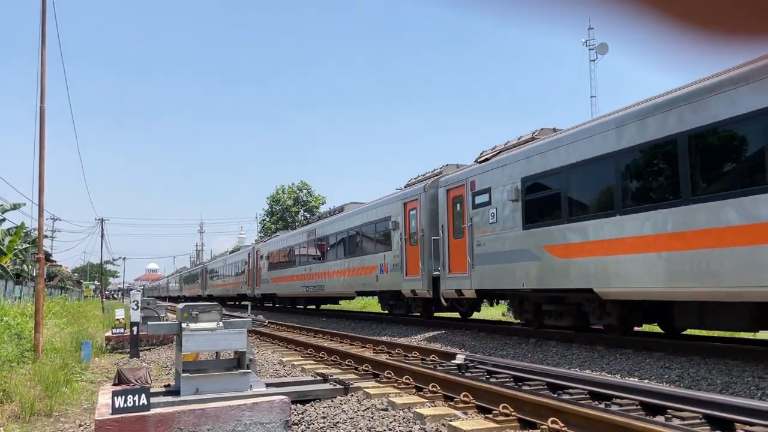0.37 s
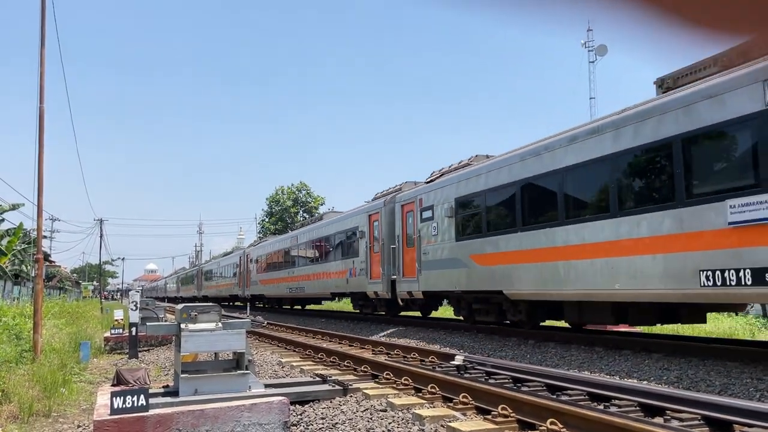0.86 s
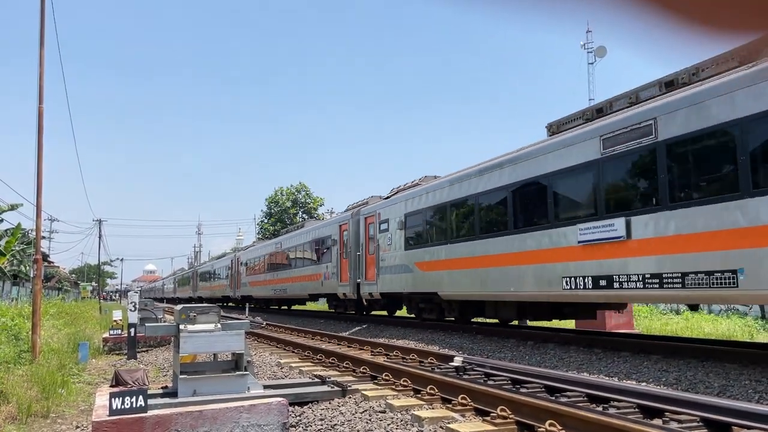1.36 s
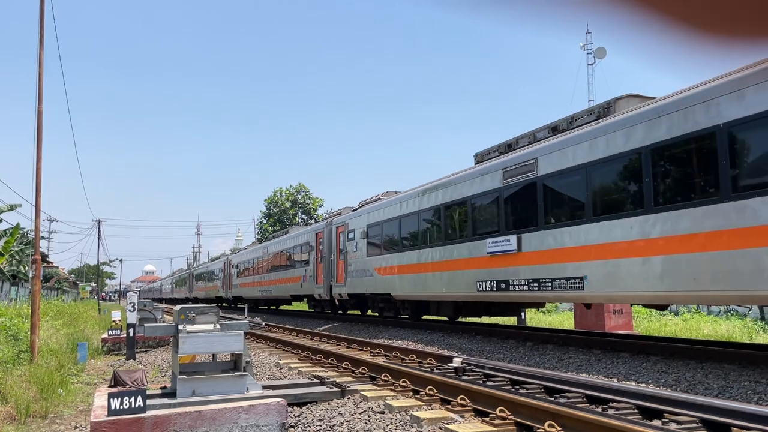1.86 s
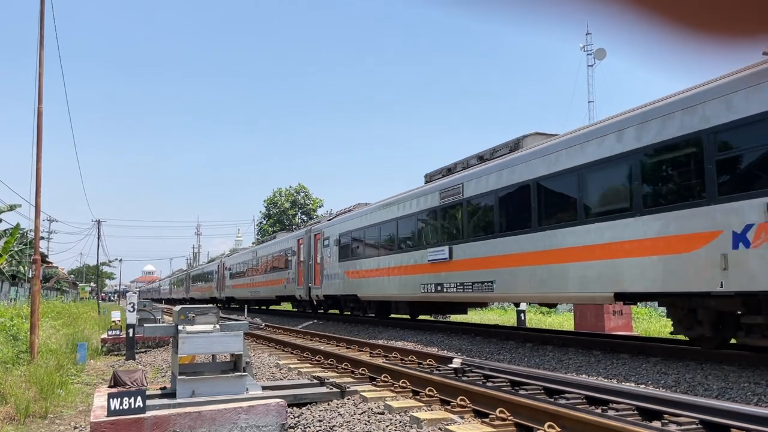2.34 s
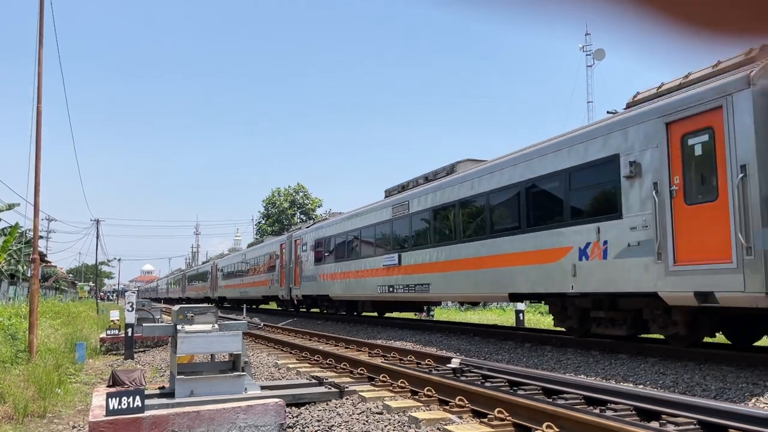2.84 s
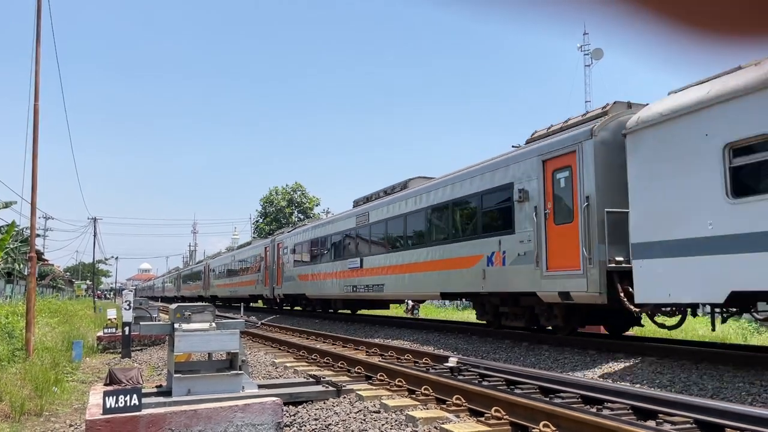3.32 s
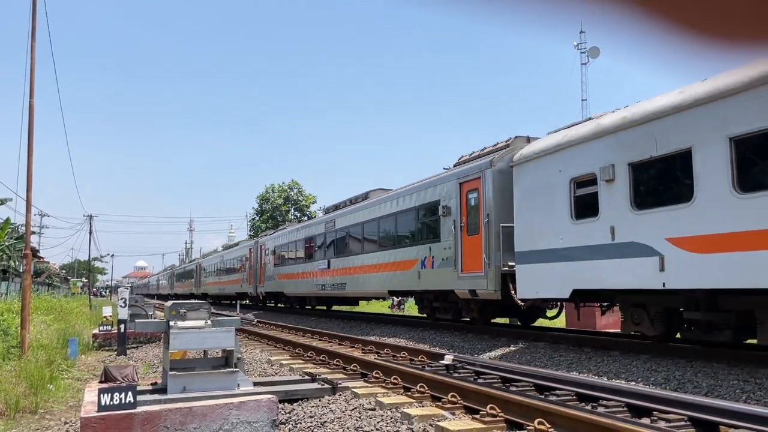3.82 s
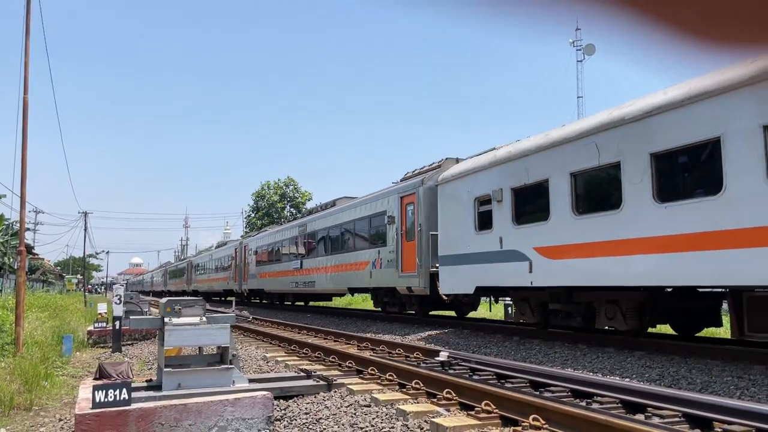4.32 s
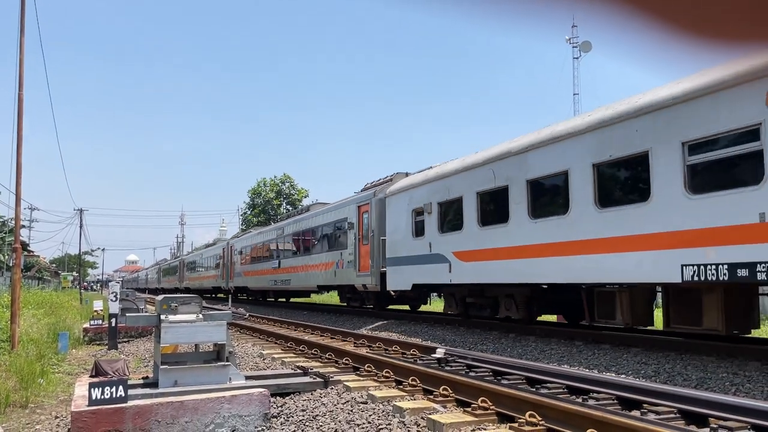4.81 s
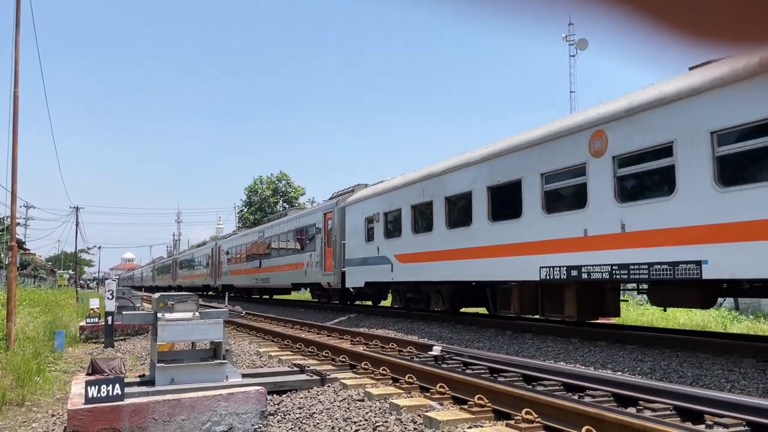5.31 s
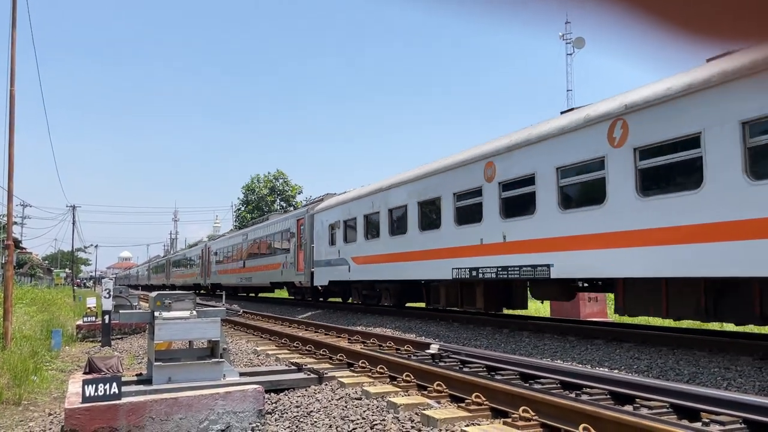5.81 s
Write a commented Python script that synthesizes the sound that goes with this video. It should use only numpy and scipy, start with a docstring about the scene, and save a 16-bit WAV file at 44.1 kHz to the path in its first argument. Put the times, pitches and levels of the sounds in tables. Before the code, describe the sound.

Outdoors beside a railway track, coaches roll slowly past. A low diesel generator drone around 60 Hz wavers over soft body rumble and faint wheel hiss. Wheels rattle over rail joints in irregular bursts, one flange squeals briefly near the middle, then the strongest clacks follow. Toward the end the clatter thins and the generator grows fuller and rougher. Close handheld stereo microphone.

```python
"""Trackside: passenger coaches roll slowly past while the generator car draws near.
Diesel: sines on multiples of the engine cycle. Body rumble and wheel-rail hiss: shaped random spectra.
Rail joints: rattling noise bursts through wheel modes. One flange squeals briefly: a sine and its octave.
Faint whines: narrow noise bands. Two microphone ports hear it, unlike in level and detail by frequency."""
import sys
import numpy as np
from scipy import signal
from scipy.fft import rfft, irfft, next_fast_len
from scipy.io import wavfile
from scipy.ndimage import uniform_filter1d

SR = 44100
rng = np.random.default_rng(int(sys.argv[2]) if len(sys.argv) > 2 else 0)


def store_pcm(level_fs):
    """Save levels as 16-bit WAV."""
    pcm = np.round(np.clip(level_fs, -1, 1) * 32767).astype(np.int16)
    wavfile.write(sys.argv[1], SR, np.atleast_2d(pcm).T)


def ratio(d):
    """dB to gain"""
    e = np.asarray(d, float) / 20
    return 10 ** e


N = 272097


def evened(x, axis=None):
    """Scale to unit rms."""
    return x / np.sqrt(np.mean(x ** 2, axis, keepdims=True) + 1e-20)


def read(table, hz):
    """Table columns against log frequency."""
    f_hz, *columns = np.transpose(table)
    return [np.interp(np.log(hz + 1), np.log(f_hz + 1), c) for c in columns]


def follow(table, t_s):
    """Table columns against time."""
    at_s, *columns = np.transpose(table)
    return [np.interp(t_s, at_s, c) for c in columns]


def add(mix, start_s, sound):
    """Add sound to mix in place, cut at the end of mix."""
    part = mix[:, round(start_s * SR):][:, :sound.shape[1]]
    part += sound[:, :part.shape[1]]


CYCLE_HZ, SPEED_M_S, TRACK_M, LEVEL_S, SOUND_M_S = 12.59, 5.8, 8., 6.4, 343.
FAR_M, NEAR_M = 31.1, 6.55  # nearness 0 beyond the first, 1 within the second


def approach(t_s):
    """Doppler-raised cycle rate [Hz] of the closing generator car, and its nearness 0-1."""
    along_m = SPEED_M_S * (LEVEL_S - t_s)
    away_m = np.hypot(along_m, TRACK_M)
    cycle_hz = CYCLE_HZ * (1 + SPEED_M_S / SOUND_M_S * along_m / away_m)
    return cycle_hz, np.clip((FAR_M - away_m) / (FAR_M - NEAR_M), 0, 1)


def shaft_beat():
    """Cosine of the crankshaft angle: two turns per engine cycle."""
    cycle_hz = approach(np.arange(N) / SR)[0]
    return np.cos(2 * 2 * np.pi * np.cumsum(cycle_hz) / SR)


# Passing levels, also used by rolling():
# (time [s], wheel-rail hiss level [dB], rumble level [dB], lowest firing tone level [dB])
PASSING_LEVELS = [(0, -36, -23.5, -16.5), (.6, -37, -20.5, -31), (1.2, -37.5, -19, -27),
                  (1.9, -36, -19.5, -30.5), (2.4, -34.5, -19.5, -34), (2.62, -35, -23, -25),
                  (2.8, -36, -21, -22.5), (3.2, -33.5, -23, -19.5), (3.6, -33.5, -20.5, -16.5),
                  (4.2, -33, -21.5, -18.5), (4.8, -32, -20.5, -21), (5.4, -32.5, -18.5, -16),
                  (5.9, -31, -17.5, -18), (6.17, -29.5, -17.5, -14.5)]
# Engine orders; the lowest firing tone is relative to its passing level:
# (multiple of the cycle rate [1], far level [dB], near level [dB])
ENGINE_ORDERS = [(5, 0.5, 0.5), (7, -33, -30), (8, -23.5, -28), (10, -28, -25), (11, -41, -57),
                 (12, -39, -31), (13, -38, -38.5), (14, -51, -38), (15, -32.5, -20), (16, -35, -39),
                 (17, -34, -65), (18, -43.5, -39), (20, -41.5, -26.5), (21, -46.5, -64), (22, -53, -24.5),
                 (23, -36, -26.5), (25, -45, -47), (27, -52, -35), (28, -49.5, -38.5), (30, -59, -39.5),
                 (31, -44.5, -31.5), (32, -53, -33), (33, -45.5, -39.5), (45, -52, -30.5), (52, -48, -37)]
CYLINDERS = 5


def generator(smear_rad=1.2, late_rad=1.0, waver=0.15, far_waver=0.26, waver_hz=1.45):
    """Diesel orders: firing orders line up into pulses; shifting echoes make every order waver."""
    t_s = np.arange(0, N + 64, 64) / SR
    near, firing_db = approach(t_s)[1], follow(PASSING_LEVELS, t_s)[2]
    turns = np.cumsum(approach(np.arange(N) / SR)[0]) / SR
    waver_filter = signal.butter(2, waver_hz, fs=SR / 64)
    out = np.zeros((2, N))
    for order, far_db, near_db in ENGINE_ORDERS:
        k = round(order)
        lowest_firing = k == CYLINDERS
        chance = rng.standard_normal((4, 2 * len(t_s)))
        echo = evened(signal.lfilter(*waver_filter, chance)[:, len(t_s):])
        # one cylinder knocks harder, once a cycle: high orders start roughly in phase
        if k % CYLINDERS == 0:
            spread_rad = 0
        elif k > 4 * CYLINDERS:
            spread_rad = smear_rad
        else:
            spread_rad = np.pi
        start_rad = np.pi + spread_rad * rng.standard_normal()
        level_db = far_db + near * (near_db - far_db) + firing_db * lowest_firing
        size = np.sqrt(2) * ratio(level_db)
        depth = waver + far_waver * (1 - near) * (not lowest_firing)
        carrier = np.exp(1j * (2 * np.pi * k * turns + start_rad))
        for path, steady in enumerate((1, np.exp(1j * late_rad))):
            slow = size * (steady + depth * (echo[path] + 1j * echo[path + 2]))
            out[path] += (np.interp(np.arange(N) / SR, t_s, slow) * carrier).real
    return out


def rolling(spectrum, column, size, patch_hz, patchy_db, flicker_db):
    """Random short-time spectra, direct and scattered, with drifting patches and a shared flicker."""
    hop = size // 4
    frames, hz = N // hop + 5, np.fft.rfftfreq(size, 1 / SR)
    a, b, c, d, patches = rng.standard_normal((frames, len(hz), 5)).T
    patch_bins = max(round(patch_hz * size / SR), 1)
    patches = uniform_filter1d(patches, patch_bins, axis=0)
    patches = evened(uniform_filter1d(patches, size=2560 // hop, axis=1))
    flicker = evened(uniform_filter1d(rng.standard_normal(frames), size=1536 // hop))
    near = approach(np.arange(frames) * hop / SR)[1]
    far_db, near_db = read(spectrum, hz)
    colour = evened(ratio(far_db[:, None] + near * (near_db - far_db)[:, None]), axis=0)
    z = np.array([a + 1j * b, c + 1j * d]) * colour
    z = z * ratio(patchy_db * patches + flicker_db * flicker)
    sound = evened(signal.istft(z, nperseg=size, noverlap=size - hop)[1][:, :N])
    return sound * ratio(follow(PASSING_LEVELS, np.arange(N) / SR)[column])


# Body rumble spectrum: (frequency [Hz], far relative level per Hz [dB], near relative level per Hz [dB])
RUMBLE_SPECTRUM = [(20, -50, -50), (32.2, -33, -39), (51, -2, -10.5), (103.7, 2, 5), (164, -10, -13),
                   (202, -11, -4.5), (307, -12.5, -8.5), (410, -17, -9), (420, -22, -18), (656, -21, -13),
                   (860, -33, -36), (1340, -64, -60)]


def rumble():
    """Coach bodies rumble; engine clatter in it beats once a shaft turn, more as the car nears."""
    sound = rolling(RUMBLE_SPECTRUM, column=1, size=2048, patch_hz=60, patchy_db=2.0, flicker_db=0.8)
    near = approach(np.arange(N) / SR)[1]
    return sound * (1 + 0.3 * near * shaft_beat())


# Wheel-rail hiss spectrum: (frequency [Hz], far relative level per Hz [dB], near relative level per Hz [dB])
HISS_SPECTRUM = [(487, -16, -13), (933, -3, -5), (1394, -4, -6.5), (1460, 4, 1), (1690, -4.5, -1.5),
                 (2295, -5, -5.5), (2380, -9.5, -12), (2940, -10.5, -11), (4340, -14, -18),
                 (5600, -17, -23), (7300, -16, -18.5), (8360, -20.5, -26.5), (12300, -29, -41),
                 (14000, -42, -61), (16000, -50, -56)]


def hiss():
    """Wheel hisses on rail; engine clatter in it beats once a shaft turn, at steady depth."""
    sound = rolling(HISS_SPECTRUM, column=0, size=512, patch_hz=297.6, patchy_db=1.72, flicker_db=1.0)
    return sound * (1 + 0.061 * shaft_beat())


# Blow spectrum: (frequency [Hz], relative level [dB])
BLOW_SPECTRUM = [(150, 8), (400, 10.5), (900, -3), (1600, 6.5), (2400, -9.5), (4000, -7.5), (6500, -19),
                 (9000, -25), (12500, -25), (16000, -63)]
# Wheel modes: (frequency [Hz], width [Hz], relative level [dB])
WHEEL_MODES = [(953, 41, 0.5), (2074, 130, -1), (2510, 26, -1), (2980, 99, -7), (3660, 18, -27),
               (4120, 23, -35), (5350, 89, -20), (6000, 96, -12), (6300, 50, -6), (7850, 46, -3.5),
               (9600, 290, -26), (11700, 19, -28), (12500, 53, -38)]
RISE_S, RING_DB = 0.0054, 2.5
SAG_DB_PER_S, EXTRA_T60_S = 79, 0.29  # sag throughout; extra decay once the rattle ends


def clatter(thump_db, treble_db, rattle_s):
    """Rattling burst: swells fast, lasts a moment and dies, part of it held in the wheel modes."""
    t_s, hz = np.arange(16384) / SR, np.fft.rfftfreq(16384, 1 / SR)
    decay_db = -60 * np.maximum(t_s - rattle_s, 0) / EXTRA_T60_S - SAG_DB_PER_S * t_s
    shape = (1 - np.exp(-t_s / RISE_S)) * ratio(decay_db)
    flutter = evened(uniform_filter1d(rng.standard_normal(len(t_s)), size=110))
    rattle = rng.standard_normal((2, len(t_s))) * ratio(2.5 * flutter)
    struck_db = rng.normal(0, 2.3, len(WHEEL_MODES))  # each blow lands elsewhere on the rim
    modes = 0
    for (mode_hz, width_hz, db), extra_db in zip(WHEEL_MODES, struck_db):
        modes = modes + ratio(db + extra_db) / (1 + 2j * (hz - mode_hz) / width_hz)
    tilt_db = read([(700, thump_db), (2000, 0), (7000, treble_db)], hz)[0]
    colour = ratio(tilt_db) * (ratio(read(BLOW_SPECTRUM, hz)[0]) + ratio(RING_DB) * modes)
    sound = irfft(rfft(rattle * shape) * colour)
    middle = (hz > 1200) & (hz < 6500)
    return sound / np.sqrt(np.mean(abs(colour[middle]) ** 2))


# Wheels over joints: (time [s], mid-band level [dB], thump tilt [dB], treble tilt [dB], rattle [s])
JOINT_BLOWS = [(.303, -25, -1.5, -0.5, 0.077), (.731, -23.5, 7, 4.5, .095), (1.389, -38.5, 4, 18, 0.042),
               (1.674, -34, -15, 7, .01), (1.842, -35, -8, 19, 0.0092), (2.148, -29, -6, -3, .01),
               (2.292, -33, 1, 8, 0.018), (2.549, -27.5, 11, 7, 0.034), (3.015, -18, -5, -4.5, 0.029),
               (3.058, -21, -6, 6, 0.014), (3.442, -21.5, 3, 3.5, .1), (3.843, -26.5, -5, -12, 0.018),
               (4.362, -16.5, 1.5, -7, 0.029), (4.773, -17.5, 1.5, -3.5, 0.07), (5.337, -38, 3, 1, .02),
               (5.809, -36, -2, 13, 0.036)]


def joints():
    """Wheels clatter over rail joints, one burst a blow."""
    out = np.zeros((2, N))
    for start_s, db, *kind in JOINT_BLOWS:
        add(out, start_s, ratio(db) * clatter(*kind))
    return out


SQUEAL_S, SWELL_S, SING_S, DROP_S = 2.815, .085, .105, .065
SQUEAL_HZ, GLIDE_HZ_PER_S = 2862, 70
SQUEAL_DB, QUIET_DB, OCTAVE_DB = -29.5, -17, -18  # the last two relative to the singing level
DIP_S, DIP_WIDTH_S, DIP_DB = 2.961, .008, -10  # the fundamental dips briefly


def squeal(throb_db=1.8, drift_hz=4):
    """Flange rubs rail, sings on a wheel mode and its octave: swells and holds, throbbing;
    then the fundamental drops while the octave lasts to a short closing taper."""
    t_s = np.arange(0, SWELL_S + SING_S + DROP_S, 1 / SR)
    swell_db = QUIET_DB * np.maximum(1 - t_s / SWELL_S, 0)
    drop_db = QUIET_DB * (np.maximum(t_s - SWELL_S - SING_S, 0) / DROP_S) ** 0.29
    dip_db = DIP_DB * np.exp(-((SQUEAL_S + t_s - DIP_S) / DIP_WIDTH_S) ** 2)
    throb, drift = evened(uniform_filter1d(rng.standard_normal((2, len(t_s))), size=700))
    pitch_hz = SQUEAL_HZ + GLIDE_HZ_PER_S * t_s + drift_hz * drift
    angle = 2 * np.pi * np.cumsum(pitch_hz) / SR + np.array([[0], [np.pi / 2]])
    fundamental = ratio(drop_db + dip_db) * np.sin(angle)
    octave = ratio(OCTAVE_DB + swell_db / 2 + throb_db * throb) * np.sin(2 * angle)
    level = np.sqrt(2) * ratio(SQUEAL_DB + swell_db + throb_db * throb)
    out = np.zeros((2, N))
    add(out, SQUEAL_S, (fundamental + octave) * level * signal.windows.tukey(len(t_s), .1))
    return out


# Faint whines: (start [s], end [s], frequency [Hz], width [Hz], level [dB])
FAINT_WHINES = [(.9, 2.9, 780, 4, -52), (4.2, 5.4, 10330, 50, -68), (5.3, 6.17, 10200, 60, -70),
                (4.95, 6.17, 1228, 14, -49), (1.8, 3.1, 1600, 90, -45), (4.0, 5.2, 2200, 130, -45),
                (5.1, 6.17, 1500, 90, -42)]


def whines():
    """Narrow noise bands: slow complex chance lifted to each pitch, fading in and out."""
    out = np.zeros((2, N))
    for start_s, end_s, hz, width_hz, db in FAINT_WHINES:
        chance = rng.standard_normal((4, 2 * SR))
        t_s = np.arange(0, min(end_s - start_s, 2), 1 / SR)
        lowpass = signal.butter(2, width_hz / 2, fs=SR, output="sos")
        a, b, c, d = evened(signal.sosfilt(lowpass, chance))[:, :len(t_s)]
        tone = (np.array([a + 1j * b, c + 1j * d]) * np.exp(2j * np.pi * hz * t_s)).real
        add(out, start_s, ratio(db) * tone * signal.windows.tukey(len(t_s), .4))
    return out


def scene():
    """Row 0 reaches both ports; row 1 is scattered sound that only the right port adds."""
    return generator() + rumble() + hiss() + joints() + squeal() + whines()


# Microphone ports: (frequency [Hz], likeness [0-1], left minus right level [dB])
PORT_LIKENESS = [(61, 0.99, -2.5), (209, 0.9, -2.5), (327, 0.35, -1.5), (442, 0, -1.5), (605, 0.26, 1.5),
                 (970, 0.23, -1.5), (1570, 0.58, 1), (2020, 0, -3), (2220, 0.52, 0.5), (2970, 0.54, 1.5),
                 (4600, 0.65, 5), (5200, 0.6, 4.5), (6580, 1, 3.5), (7900, 0.95, 0), (9750, 0.87, -1),
                 (10300, 0.94, 8), (11800, 1, -4.5), (13100, 0.66, 1.5)]
# Stereo phase, nearly flat steps in the treble: (frequency [Hz], left lead [rad])
STEREO_LEAD = [(60, -.1), (330, -.5), (440, -1), (560, -2.8), (950, -2.3), (1900, -2.1), (2200, .4),
               (3000, .8), (4600, 0), (5600, -.1), (6800, -3.1), (7900, -3.25), (10300, -6.26),
               (12000, -6.32), (13300, -9.35), (16000, -9.45)]


def stereo(dry):
    """Two ports differ in likeness and balance with frequency; a stereo phase by frequency is added."""
    size = next_fast_len(N + 4096)
    hz = np.fft.rfftfreq(size, 1 / SR)
    alike, balance_db = read(PORT_LIKENESS, hz)
    lead_rad = read(STEREO_LEAD, hz)[0]
    alike = np.clip(alike, 0, 1)
    direct, scattered = rfft(dry, size)
    left = direct * np.exp(.5j * lead_rad) * ratio(balance_db / 2)
    right = alike * direct * np.exp(-.5j * lead_rad) + np.sqrt(1 - alike ** 2) * scattered
    right = right / ratio(balance_db / 2)
    return irfft(np.array([left, right]), size)[:, :N]


def low_pass(x):
    """Removes everything above the highest recorded frequency."""
    return signal.sosfilt(signal.butter(12, 15700, fs=SR, output="sos"), x)


def record(dry):
    """Stereo ports, then loud peaks rounded below 0.95 of full scale."""
    ports = stereo(dry)
    rounded = ports / (1 + (abs(ports) / .95) ** 6) ** (1 / 6)
    return low_pass(rounded)


dry = scene()
out = record(dry)
store_pcm(out)
```